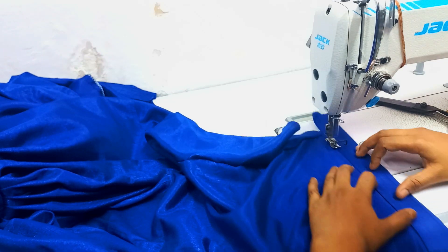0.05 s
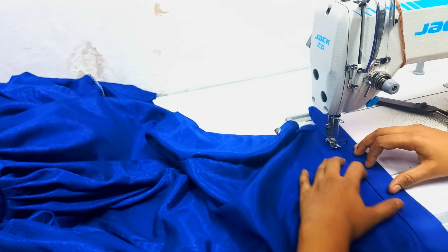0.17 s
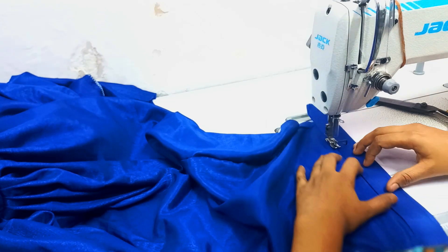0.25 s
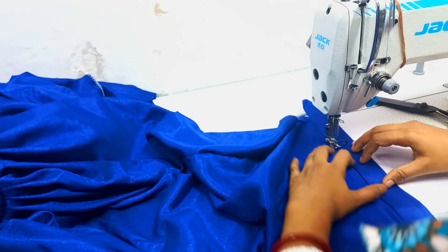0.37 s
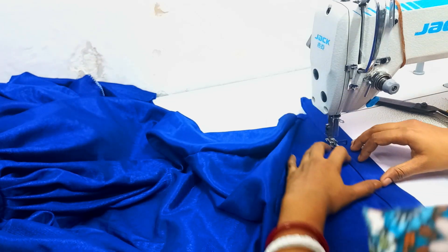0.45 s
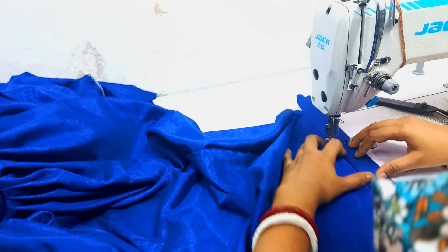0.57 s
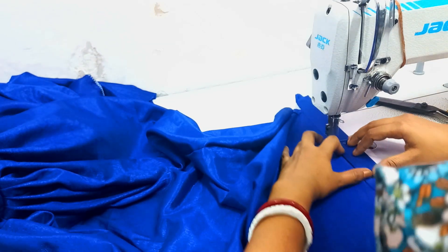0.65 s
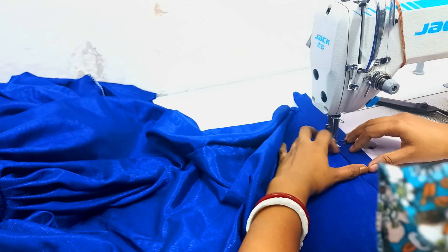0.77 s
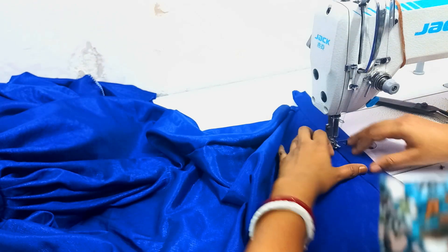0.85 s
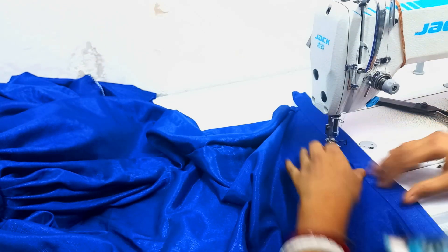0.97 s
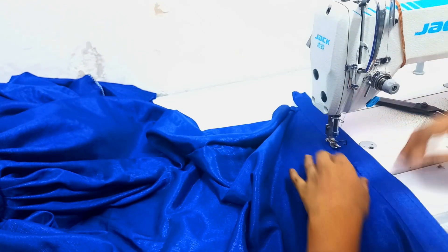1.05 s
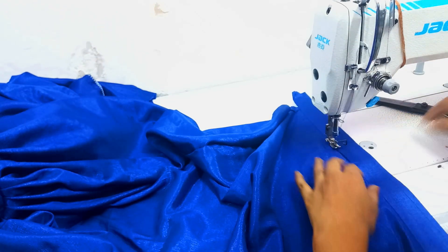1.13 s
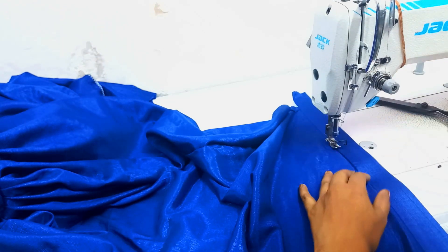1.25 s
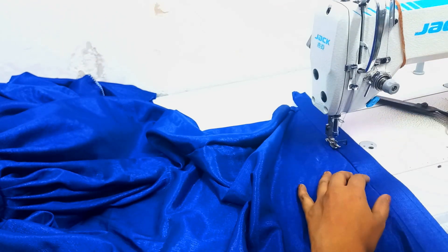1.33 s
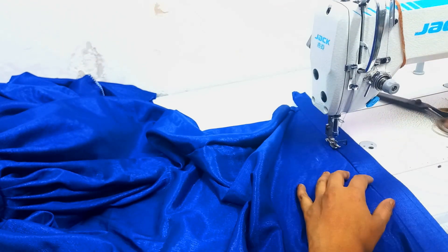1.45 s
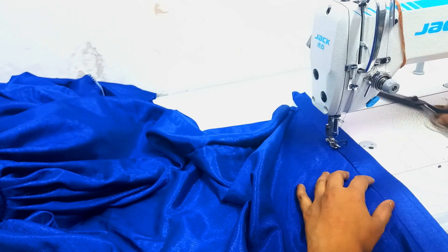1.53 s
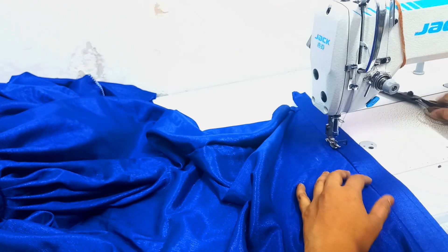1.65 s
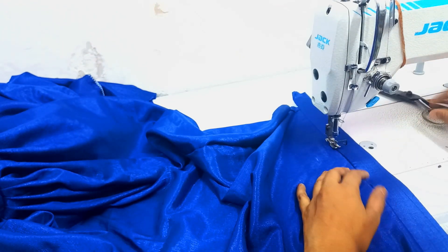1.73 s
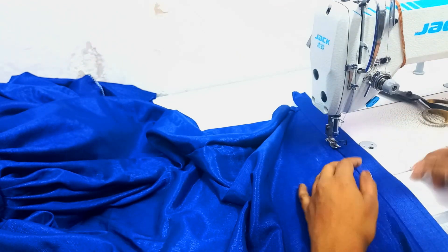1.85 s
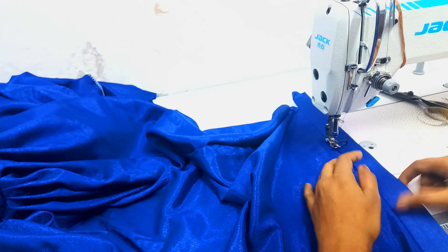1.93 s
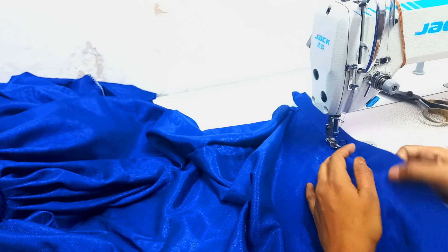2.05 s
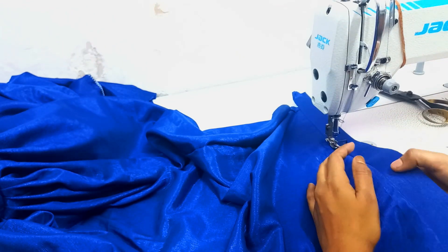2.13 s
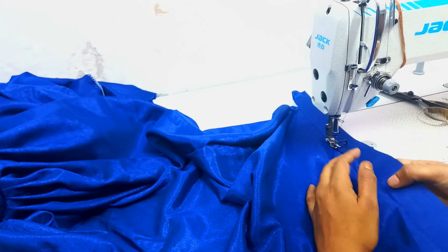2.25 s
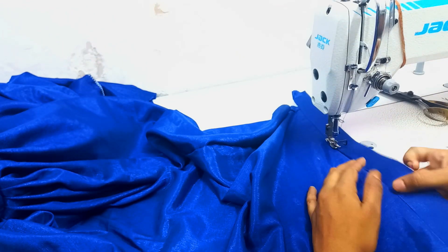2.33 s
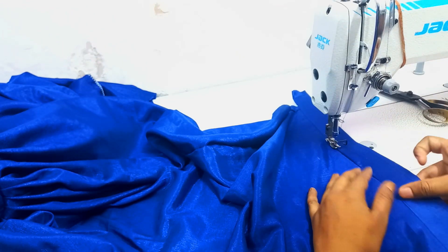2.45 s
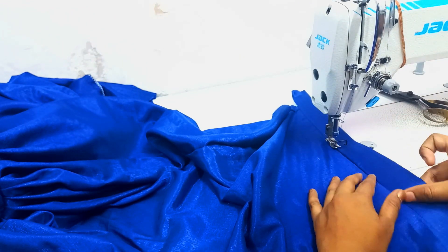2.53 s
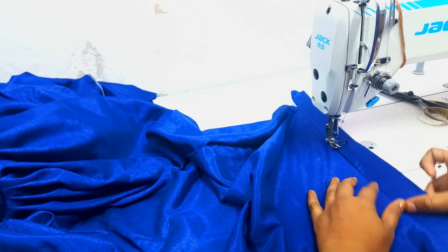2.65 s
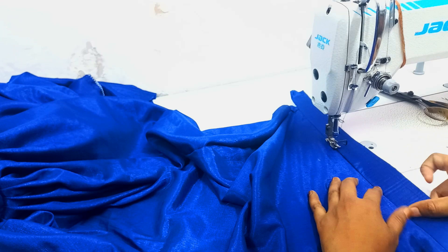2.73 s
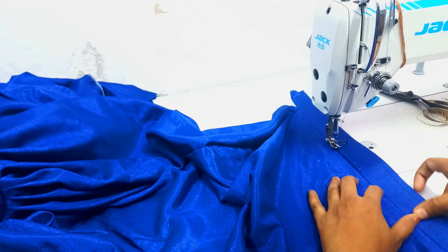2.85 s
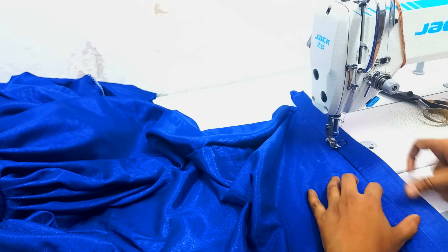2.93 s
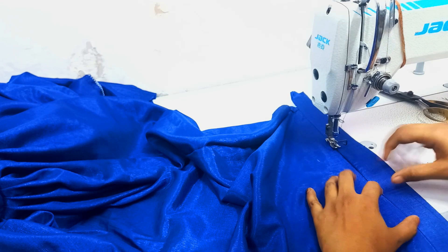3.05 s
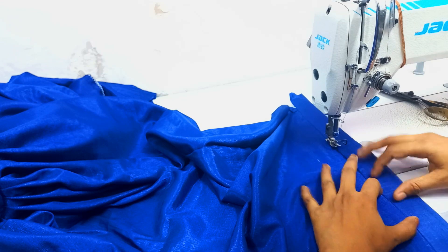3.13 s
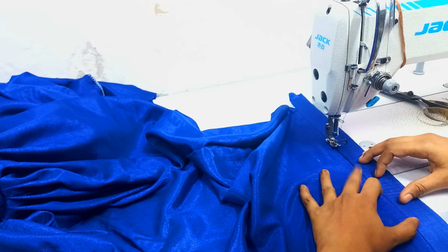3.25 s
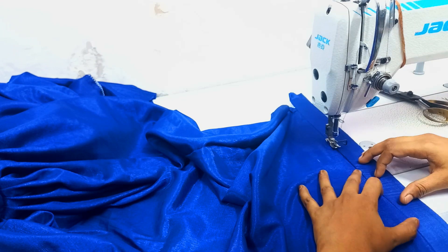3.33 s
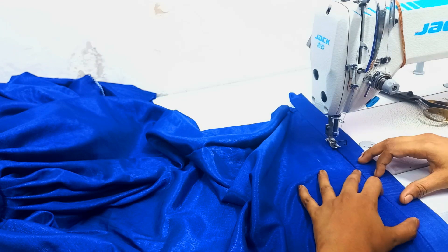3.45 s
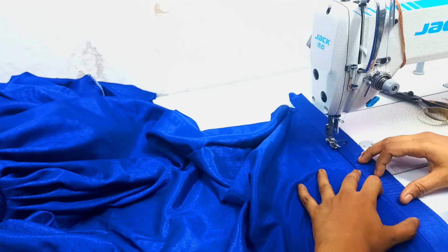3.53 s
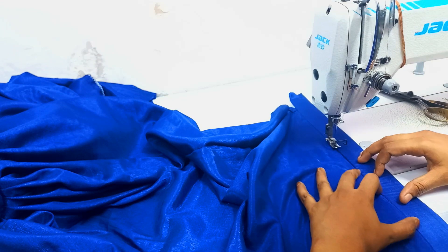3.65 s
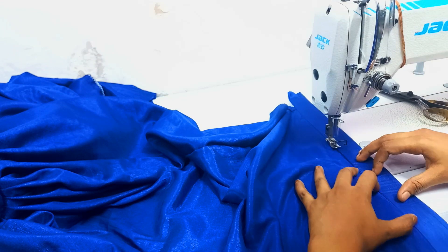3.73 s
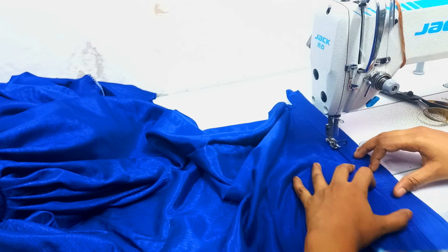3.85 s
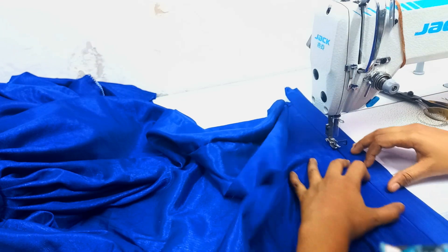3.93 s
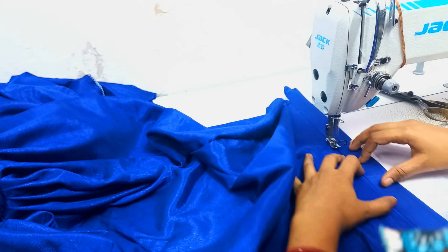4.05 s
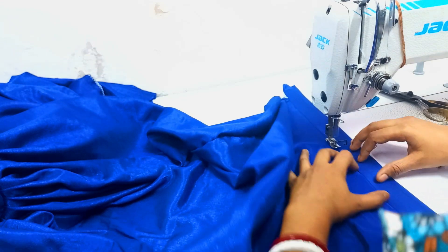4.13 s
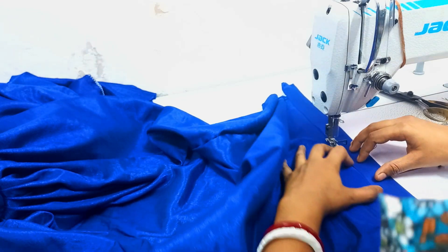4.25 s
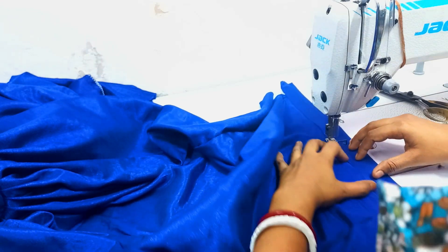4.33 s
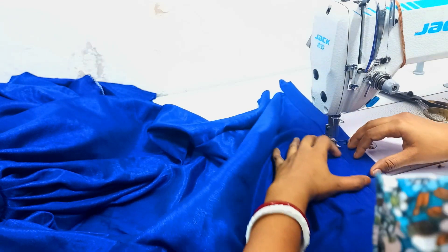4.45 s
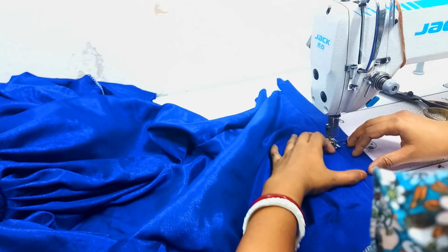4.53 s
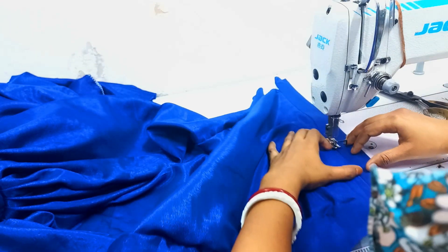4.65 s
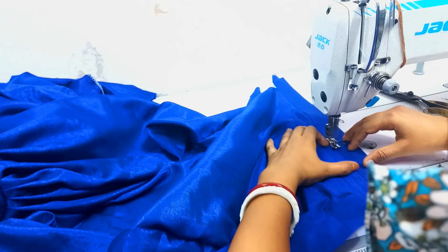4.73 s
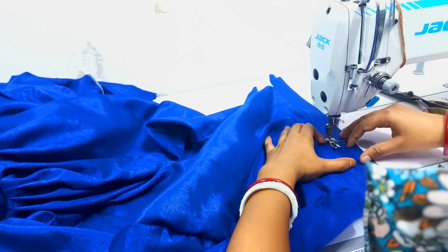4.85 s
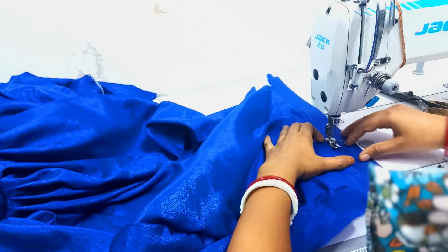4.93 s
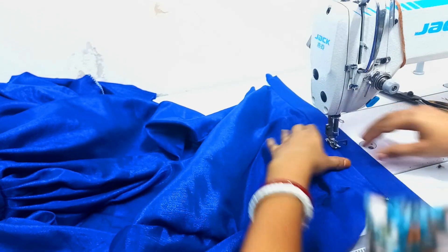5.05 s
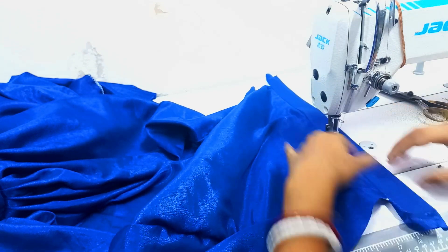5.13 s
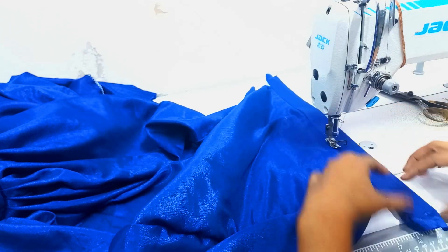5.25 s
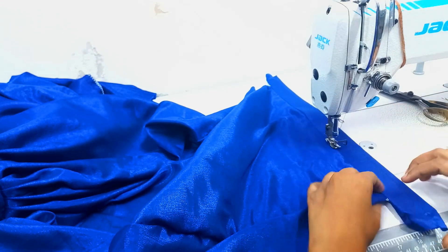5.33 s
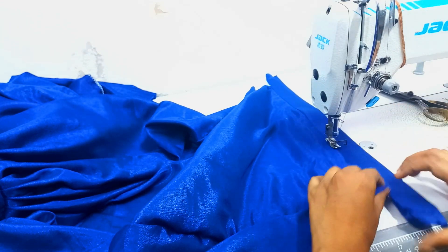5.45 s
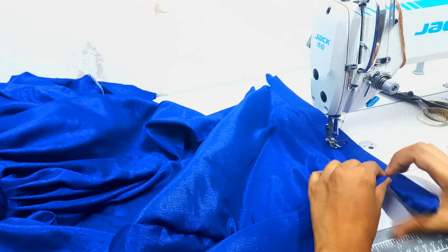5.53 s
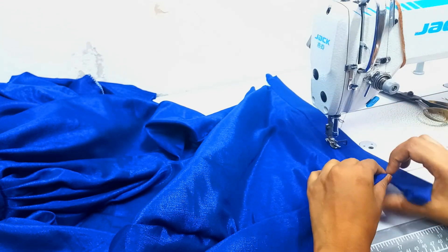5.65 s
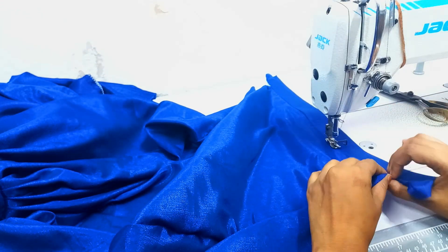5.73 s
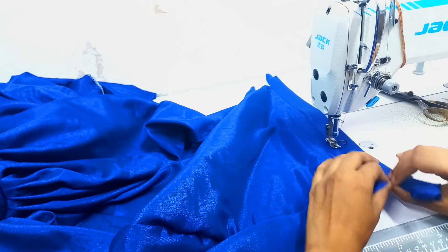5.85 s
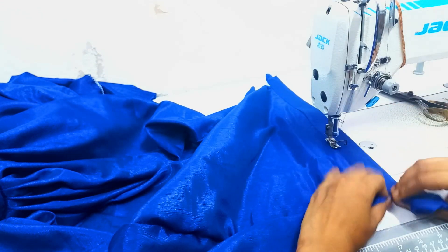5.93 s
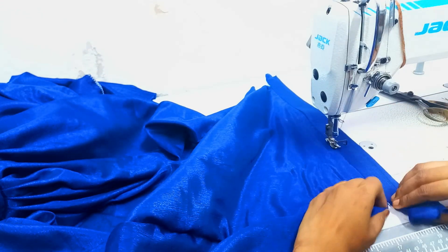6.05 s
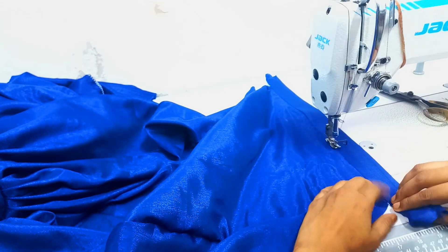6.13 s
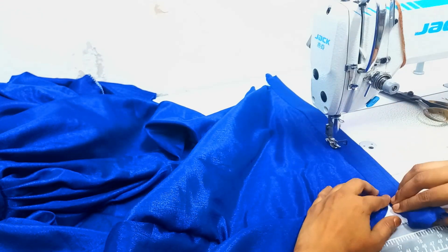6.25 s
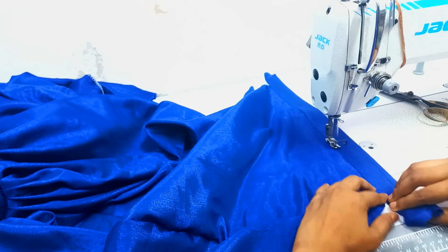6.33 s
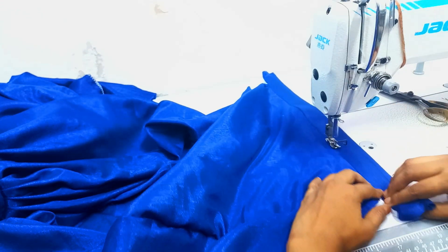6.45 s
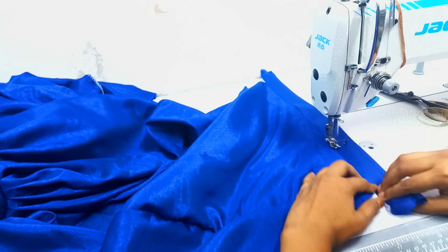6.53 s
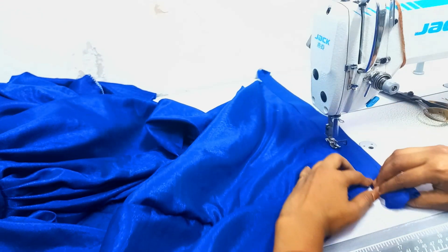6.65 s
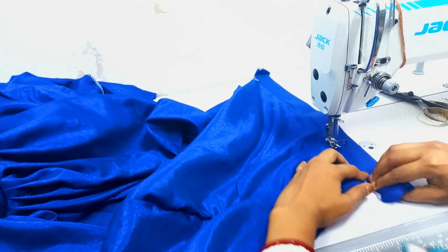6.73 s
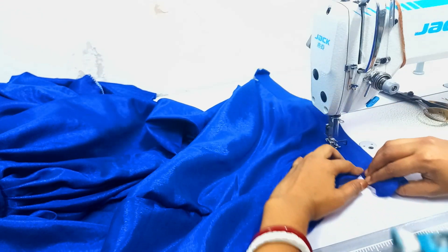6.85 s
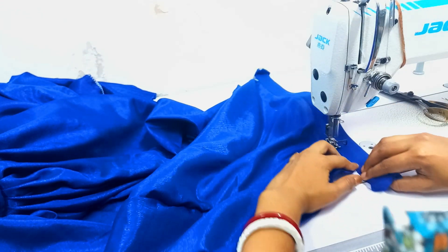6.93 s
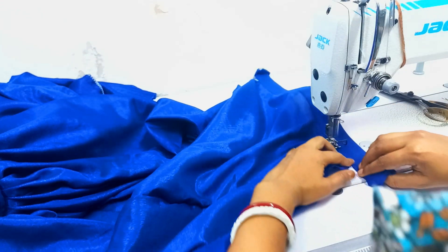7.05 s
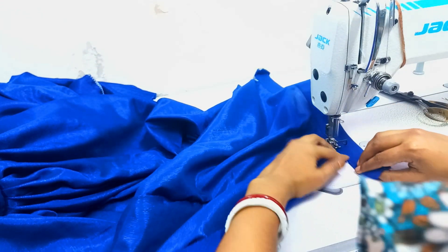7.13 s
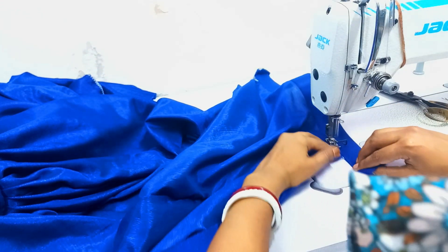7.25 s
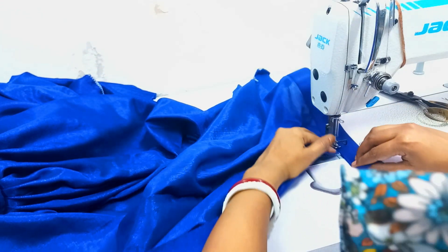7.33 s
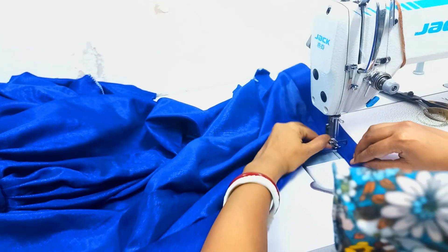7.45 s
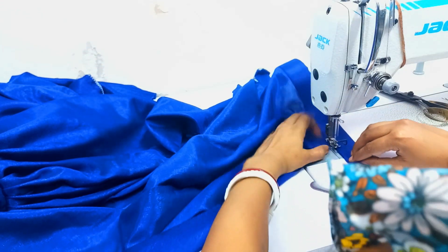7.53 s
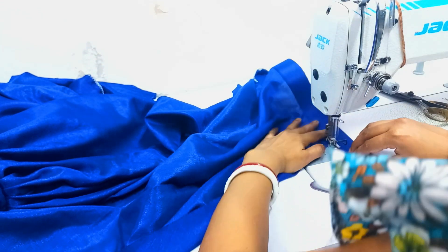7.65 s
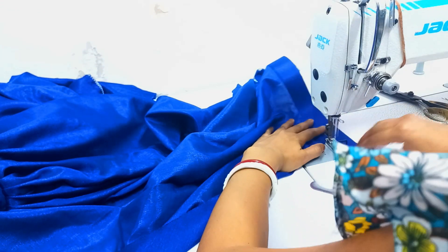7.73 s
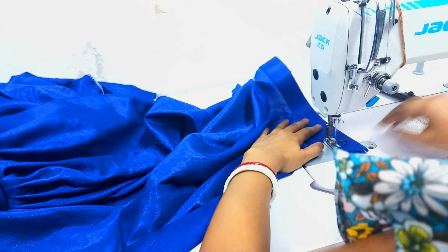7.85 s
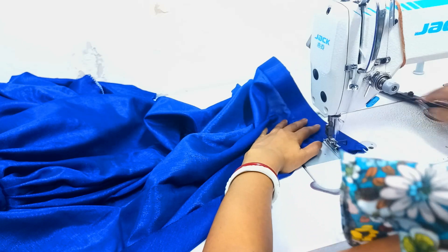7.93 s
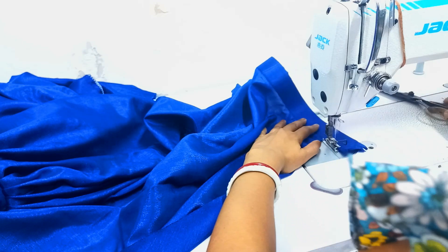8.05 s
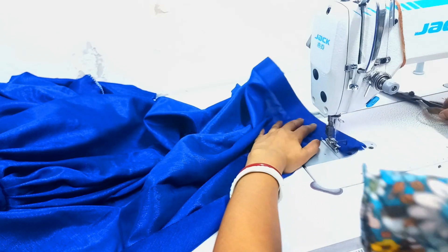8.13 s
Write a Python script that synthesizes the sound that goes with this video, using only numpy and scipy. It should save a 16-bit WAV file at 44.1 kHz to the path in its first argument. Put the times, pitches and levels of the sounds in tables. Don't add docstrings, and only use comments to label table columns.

```python
import sys
import numpy as np
from scipy import signal
from scipy.fft import rfft, irfft, next_fast_len
from scipy.io import wavfile
from scipy.ndimage import uniform_filter1d, map_coordinates

SR = 44100
rng = np.random.default_rng(int(sys.argv[2]) if len(sys.argv) > 2 else 0)


def put_to_file(sound):
    columns = np.atleast_2d(sound).T
    safe = np.clip(columns, -1, 1)
    whole_steps = np.round(safe * 32767)
    wavfile.write(sys.argv[1], SR, whole_steps.astype(np.int16))


def boost_factor(decibels):
    exponent = np.asarray(decibels, float) / 20
    return 10 ** exponent


N = 360633
T = np.arange(N) / SR


def unit(x):
    return x / np.sqrt(np.mean(x ** 2) + 1e-20)


def along(points, hz):
    f, v = np.transpose(points)
    return np.interp(np.log(hz + 1), np.log(f + 1), v)


def curves(tables):
    rows = []
    for table in tables:
        silence = (-120,) * (len(table[0]) - 1)
        rows += [(table[0][0] - .02,) + silence, *table, (table[-1][0] + .04,) + silence]
    s, *cols = np.transpose(rows)
    return [np.interp(T, s, c) for c in cols]


def wobble(rate):
    coarse = T[::64]
    knots = rng.standard_normal(int(N * rate / SR) + 4)
    return np.interp(T, coarse, map_coordinates(knots, [coarse * rate]))


def filtered(x, response):
    m = next_fast_len(len(x) + 8192)
    return irfft(rfft(x, m) * response(np.fft.rfftfreq(m, 1 / SR)), m)[:len(x)]


def coloured(x, spectrum):
    return unit(filtered(x, lambda hz: boost_factor(along(spectrum, hz))))


def noise():
    return rng.standard_normal(N)


def lines(turn, speed, orders, response, drift_db, levelled=True, apart=1):
    gains = [boost_factor(db + along(response, k * speed)) for k, db in orders]
    total = 0
    for gain, (k, _) in zip(gains, orders):
        phase = k * turn + apart * (rng.random() - .5)
        total = total + gain * boost_factor(drift_db * wobble(12)) * np.cos(2 * np.pi * phase)
    return total / (np.sqrt(np.sum(np.square(gains), axis=0) / 2) if levelled else 1)


def causal(x, spectrum):
    ceps = irfft(np.log(boost_factor(along(spectrum, np.fft.rfftfreq(4096, 1 / SR))) + 1e-6))
    ceps[1:2048] *= 2
    ceps[2049:] = 0
    answer = irfft(np.exp(rfft(ceps)))
    return signal.fftconvolve(x, answer / np.linalg.norm(answer))[:N]


def knocks(events, body, level_db):
    push, t = np.zeros(N + SR), T[:SR // 2]
    for s, db, rise, t60 in events:
        swell = 1 - np.exp(-t / max(rise, 1e-4))
        decay = boost_factor(db - 60 * t / max(t60, .01))
        push[round(s * SR):][:len(t)] += decay * swell * rng.standard_normal(len(t))
    return boost_factor(level_db) * causal(push[:N], body)


def rings(rows, attack_s):
    out, t = np.zeros(N + SR), T[:SR // 2]
    for s, db, hz, t60 in rows:
        envelope = boost_factor(db - 60 * t / t60) * (1 - np.exp(-t / attack_s))
        out[round(s * SR):][:len(t)] += envelope * np.sin(2 * np.pi * hz * t)
    return out[:N]


def swells(rows):
    levels = []
    for s, db, hold, fall, rise in rows:
        levels.append(db - rise * np.clip(s - T, 0, None) - fall * np.clip(T - s - hold, 0, None))
    return np.max(levels, axis=0)


# (time [s], shaft speed [turns/s], running level [dB])
FIRST_BURST = [
    (0.0, 70.07, -23.5),
    (0.11, 66.65, -21.3),
    (0.585, 66.4, -21.3),
    (0.66, 61.27, -21.5),
    (0.795, 51.07, -26),
    (0.884, 46.27, -25.5),
    (0.93, 43.83, -33.5),
    (1.0, 40.86, -46),
    (1.03, 39.7, -56),
    (1.2, 37.63, -101),
]
SECOND_BURST = [
    (3.815, 30.2, -77),
    (3.896, 35.79, -43.5),
    (3.95, 40.33, -31.5),
    (4.085, 56.08, -24.5),
    (4.31, 51.83, -25.5),
    (4.6, 48.33, -25),
    (4.9, 44.15, -25.5),
    (5.03, 35.62, -28.5),
    (5.14, 33.96, -49),
    (5.25, 33.21, -90),
]
THIRD_BURST = [(6.458, 30.54, -62), (6.5, 34.2, -38), (6.6, 47.86, -26), (6.645, 50.37, -26),
               (6.72, 52.22, -25), (6.974, 50.16, -25), (7.56, 48.4, -24.5), (7.76, 46.13, -24),
               (7.85, 44.3, -27.5), (7.935, 42.71, -35), (8.0, 39.64, -58.5), (8.17, 38.74, -95)]


def shaft():
    speed, running_db = curves([FIRST_BURST, SECOND_BURST, THIRD_BURST])
    speed = np.clip(speed, 25, 80)
    loose = np.clip((68 - speed) / 10, .3, 1)
    turn = np.cumsum(speed * (1 + .003 * loose * wobble(15))) / SR
    return speed, running_db, loose, turn


def brake_unevenness(acceleration, rate):
    return 2 * np.clip(-acceleration / 50, 0, 1) * (wobble(rate) - .5)


# (frequency [Hz], level [dB])
TABLE_RESPONSE = [(30, -10), (48, 0), (58, -2), (67, 7), (80, -2.5), (100, 4.5), (123, -11)]
# (shaft speed [turns/s], level [dB])
SHAKE_AT_SPEED = [(33, -10.5), (37, 4), (42, 1), (46, -3.5), (52, -6), (57, -0.5), (66, 3.5), (71, 12)]


def table_shake(turn, speed, running_db, loose, acceleration):
    level_db = running_db + along(SHAKE_AT_SPEED, speed) + brake_unevenness(acceleration, 28)
    shake = lines(turn, speed, [(1, 0.8), (2, -1.5)], TABLE_RESPONSE, drift_db=1.2, apart=0)
    rumble = coloured(noise(), [(15, -42.5), (35, 2.0), (110, 1.0), (200, -47.5)])
    shake += boost_factor(-23.5 + 15 * loose) * rumble
    return boost_factor(level_db - 1.5 + .6 * loose * wobble(9.9)) * shake


# (order [multiple of shaft speed], level [dB])
SHAFT_ORDERS = [(3, 1.5), (4, 0), (5, -8), (6, 2), (6.28, -1), (7, 0), (8, -2), (9, -6), (9.4, -9),
                (10, -2), (11, -1), (12, -3), (12.57, 0), (13, -7), (14, -12), (16, -18)]
# (frequency [Hz], level [dB])
BED_RESPONSE = [(140, -5), (175, 5), (197, 1), (240, 0), (266, -9), (291, 9), (310, 1), (345, 1), (398, 7),
                (418, 12), (440, 0), (475, 1), (515, 3), (565, 6), (610, 6), (660, 6), (740, 5), (830, 2),
                (950, 3)]
# (frequency [Hz], density [dB/Hz])
HUM_COLOUR = [(88, -37), (150, -5), (189, 0.5), (236, -5), (306, -0.5), (467, -0.5), (621, 3.5), (1000, -4),
              (1300, -44.5), (2200, -120)]
# (shaft speed [turns/s], level [dB])
HUM_AT_SPEED = [(33, -4), (37, -3), (41, -3), (45, 1.5), (52, 2), (59, 2.5), (66, 4.5), (71, 2.5)]


def bed_hum(turn, speed, running_db, loose, acceleration, load, braking, rattle):
    level_db = running_db + brake_unevenness(acceleration, 22) + along(HUM_AT_SPEED, speed)
    level_db += 0.94 - 3 * braking
    level_db -= 4.5 * load * np.clip(46 - speed, 0, 1)
    level_db += .6 * loose * wobble(11)
    orders = lines(turn - .065, speed, SHAFT_ORDERS, BED_RESPONSE, drift_db=2.5 * loose, apart=.1 + .9 * loose)
    hum = boost_factor(-1 - 1.5 * loose) * orders
    hum += boost_factor(-10 + 4.5 * loose) * coloured(rattle * noise(), HUM_COLOUR)
    return boost_factor(level_db) * hum


# (shaft angle [part of a turn], level [dB])
CONTACT_ANGLES = [(0.02, 8), (0.149, -3), (0.297, 3.5), (0.421, -8.5), (0.551, -3.5), (0.638, -10),
                  (.72, -9), (0.832, -0.5), (.92, -4.5)]


def strikes(turn, jitter_s, scatter_db, ring_s):
    t, out = T[:SR // 20], np.zeros(N)
    for angle, db in CONTACT_ANGLES:
        at = np.flatnonzero(np.diff(np.floor(turn - angle)))
        jitter, scatter = rng.standard_normal((2, len(at)))
        at = np.clip(at + np.round(jitter_s * SR * jitter).astype(int), 0, N - 1)
        blows = np.bincount(at, boost_factor(db + scatter_db * scatter), N)
        out += signal.fftconvolve(blows, rng.standard_normal(len(t)) * boost_factor(-60 * t / ring_s))[:N]
    return out / np.sqrt(uniform_filter1d(out ** 2, size=8000) + 1e-3)


# (frequency [Hz], density [dB/Hz])
CLATTER_COLOUR = [(590, -35), (1000, -7), (1380, -2), (1890, -5.5), (2070, -2), (2640, -7.5), (3860, -6),
                  (4190, -10), (4870, -7.5), (5150, -15), (5450, -15.5), (5700, -20.5), (8180, -24.5),
                  (9080, -23.5), (10300, -40), (14600, -42), (15800, -46.5)]


def part_clatter(turn, speed, loose, rattle):
    tight = np.clip((speed - 30) / 30, .3, 1.3)
    metal = tight * strikes(turn, jitter_s=.00003, scatter_db=2, ring_s=.03)
    return coloured(metal + (0.72 + 0.28 * loose) * rattle * noise(), CLATTER_COLOUR)


# (frequency [Hz], level [dB])
LEVER_COLOUR = [(6000, -30), (7500, -12), (8500, -8), (9100, 0), (9600, -10), (11000, -28), (13500, -24),
                (14600, -17), (15800, -28)]


def thread_lever(turn, speed, scatter_db, t60):
    at, t = np.flatnonzero(np.diff(np.floor(turn - .7))), T[:SR // 40]
    size = boost_factor(scatter_db * np.clip(rng.standard_normal(len(at)), -3, 1.4))
    snap = boost_factor(-60 * t / t60) * (1 - np.exp(-t / 0.0025))
    swell = signal.fftconvolve(np.bincount(at, size, N), snap)[:N]
    quieter_when_slow = np.clip((speed - 42) / 5, .75, 1)
    return boost_factor(-23.5) * quieter_when_slow * coloured(swell * noise(), LEVER_COLOUR)


# (frequency [Hz], bandwidth [Hz], level [dB])
COVER_MODES = [(3060, 110, -20), (3950, 130, -18), (4550, 80, -24), (4980, 130, -23), (5450, 70, -27),
               (7500, 150, -33)]


def loose_covers(flutter_db):
    total = 0
    for hz, width, db in COVER_MODES:
        ring = unit(filtered(noise(), lambda f: 1 / (1 + (2 * (f - hz) / width) ** 2)))
        total = total + boost_factor(db + flutter_db * (wobble(9) + wobble(30))) * ring
    return total


# (order [multiple of shaft speed], level [dB])
TOOTH_ORDERS = [(25.1, -12), (33, -2), (42, -4), (44, 2), (46, -9), (66, 1), (68, -11)]
# (frequency [Hz], level [dB])
PLATE_RESPONSE = [(1000, -10), (1320, -9), (1400, 3), (1470, -6), (1600, -1), (1700, -8), (1900, -9),
                  (2050, 3), (2110, -1), (2200, -8), (2310, -3), (2400, 7), (2480, 9), (2620, -12),
                  (2900, -10), (3050, -2), (3200, -9), (3290, -7), (3400, 4), (3700, 4), (3850, -6),
                  (4400, -10), (4550, 2)]


def tooth_whine(turn, speed, load, braking):
    level_db = -10 + 2.5 * load - 7 * braking + 3 * wobble(70)
    whine = lines(turn, speed, TOOTH_ORDERS, PLATE_RESPONSE, drift_db=2.5, levelled=False)
    return boost_factor(level_db) * np.clip((speed - 36) / 6, 0, 1) * whine


# (order [multiple of shaft speed], level [dB])
LOCKED_ORDERS = [(23, 3), (24, 2), (29, -4), (32, -4), (33, 3), (35, -3), (36, 4), (41, -5), (58, -7),
                 (68, -7)]


def full_speed_whine(turn, speed):
    whine = lines(turn, speed, LOCKED_ORDERS, [(1, 0)], drift_db=2, levelled=False)
    return boost_factor(-16) * np.clip((speed - 61) / 4, 0, 1) * whine


# (frequency [Hz], level [dB])
PULL_UP_COLOUR = [(400, 0), (630, -0.5), (800, 0), (1020, -20), (1250, -1), (2500, 0), (3600, -1),
                  (6000, 2.5)]


def machine():
    speed, running_db, loose, turn = shaft()
    acceleration = np.gradient(speed) * SR
    gaining = np.clip(acceleration / 40, 0, 1)
    pulling = uniform_filter1d(gaining * (T > 6), size=3000)
    starting = uniform_filter1d(gaining * np.clip((46 - speed) / 8, 0, 1), size=1500)
    load = uniform_filter1d(np.clip((acceleration - 22) / 30, 0, 1), size=2000)
    braking = uniform_filter1d(np.clip((-acceleration - 22) / 30, 0, 1), size=2000)
    rattle = boost_factor((4.5 - 2.3 * loose) * np.cos(2 * np.pi * (turn - .7)) + 1.2 * wobble(30))

    shake = table_shake(turn, speed, running_db, loose, acceleration)
    hum = bed_hum(turn, speed, running_db, loose, acceleration, load, braking, rattle)
    clatter = part_clatter(turn, speed, loose, rattle)
    clatter += thread_lever(turn, speed, scatter_db=3.5, t60=.018)
    clatter += rattle * loose_covers(flutter_db=2.5)
    clatter += tooth_whine(turn, speed, load, braking)
    clatter += full_speed_whine(turn, speed)
    clatter += clutch_bite(starting)
    clatter += singing_lid(speed)
    clatter += pull_up_whine(turn, speed, pulling)
    sparse = np.clip((-36 - running_db) / 10, 0, 1) * (1 - starting)
    clatter *= boost_factor(1.5 * sparse * np.clip(wobble(70) - .5, -2, 1))

    head = hum + boost_factor(running_db - 2.5) * clatter
    hollow = filtered(head, lambda hz: boost_factor(along(PULL_UP_COLOUR, hz)))
    return shake + (1 - pulling) * head + pulling * hollow


# (time [s], level [dB], frequency [Hz], T60 [s])
HANDLED_MODES = [(1.56, -52, 2202, .14), (1.56, -55, 2700, .2), (1.563, -44, 860, 0.18),
                 (1.605, -44.5, 590, 0.14), (1.556, -67, 4506, .3), (1.655, -72, 5700, .3),
                 (1.76, -42, 668, .09), (1.752, -47, 1007, 0.089), (1.752, -54, 1841, .12),
                 (1.77, -72, 4160, .2), (1.62, -72, 7074, .08), (5.055, -34, 860, .15),
                 (5.085, -41, 790, 0.13), (3.07, -74, 2250, .3), (6.466, -46.5, 640, 0.25),
                 (3.865, -55, 640, .2), (3.895, -44, 620, .15), (6.05, -73, 4300, .05),
                 (4.895, -34, 1415, .25), (4.93, -33, 1370, .15), (.03, -23.5, 630, .2),
                 (.035, -23.5, 680, .2)]


def handled_metal():
    return rings(HANDLED_MODES, attack_s=0.00092)


# (time [s], level [dB])
CLOTH_PULLS = [
    (0.95, -64),
    (1.05, -56.5),
    (1.66, -66.5),
    (2.7, -77),
    (2.86, -75),
    (3.4, -82),
    (5.1, -62),
    (7.98, -67),
]
# (frequency [Hz], density [dB/Hz])
CLOTH_COLOUR = [(1470, -31), (2500, -2.5), (3340, -9), (4390, -5.5), (4670, 2), (5200, -3.5), (5650, -4.5),
                (6350, -17), (7070, -9.5), (8400, -16.5), (9500, -25.5), (12400, -49), (20900, -120)]


def sliding_cloth(room_db):
    pull_db = swells([(s, db, 0, 180, 150) for s, db in CLOTH_PULLS])
    cloth = coloured(boost_factor(2.2 * wobble(60)) * noise(), CLOTH_COLOUR)
    return boost_factor(np.maximum(room_db - 20, pull_db) - 1.5) * cloth


# (time [s], peak level [dB], rise [s], T60 [s])
COASTING_KNOCKS = [(0.965, -40, .001, .05), (0.995, -32, .004, 0.077), (5.072, -29, .001, 0.059),
                   (5.118, -34.5, .002, 0.082), (5.135, -38, 0.0011, .05), (5.153, -46, .001, .05),
                   (5.168, -42, .001, 0.053), (5.195, -57, .001, .05), (7.972, -45, .001, .05),
                   (7.995, -48, .001, 0.049), (8.006, -52, .001, 0.053), (8.025, -50, .001, 0.046),
                   (8.0645, -55, .001, .04), (8.09, -58, .002, .06), (8.1, -60.5, .001, .04),
                   (8.148, -64, 0.0011, 0.04)]
# (frequency [Hz], density [dB/Hz])
COASTING_COLOUR = [(900, -38), (1600, -5), (2200, -6), (2600, -10), (3100, 1), (4000, -4), (5200, -7),
                   (7500, -23.5), (12000, -59.5)]


def coasting_parts():
    return knocks(COASTING_KNOCKS, COASTING_COLOUR, -5.0)


# (time [s], room level [dB], hold [s], sink [dB/s])
GATE_OPENINGS = [
    (0.97, -57.5, 0.0099, 50),
    (1.451, -64, 0.33, 23),
    (2.502, -64.5, .4, 34),
    (3.24, -65.5, 0.093, 33.5),
    (3.42, -62.5, 0.16, 48),
    (5.12, -62.5, .03, 39),
    (5.496, -65.5, 0.19, 34),
    (7.978, -57.5, 0.019, 77.5),
]


def gated_level():
    return swells([(*row, 280) for row in GATE_OPENINGS])


# (frequency [Hz], density [dB/Hz])
ROOM_COLOUR = [(47, -22), (80, -12.5), (135, -4.5), (256, -9), (349, -10), (476, -12.5), (1130, -15.5),
               (1880, -24), (4000, -38.5), (5200, -66), (8800, -120)]


def room_murmur(room_db):
    return boost_factor(room_db + 4.0) * coloured(boost_factor(1.3 * wobble(41)) * noise(), ROOM_COLOUR)


# (time [s], level [dB])
HAND_THUMPS = [(0.97, -46), (1.47, -45), (1.96, -54), (2.52, -41.5), (2.69, -45), (2.84, -41), (3.19, -50),
               (3.58, -52), (5.1, -37), (5.506, -41), (7.98, -46), (8.088, -53)]
# (frequency [Hz], density [dB/Hz])
THUMP_COLOUR = [(12, -29.5), (20, 1), (48, -1), (94, -3), (157, -15.5), (300, -31.5), (390, -56),
                (660, -120)]
# (time [s], level [dB], frequency [Hz], T60 [s])
PALM_LANDINGS = [
    (1.428, -30.5, 50, 0.075),
    (1.458, -44, 120, 0.19),
    (1.475, -45, 35.2, 0.2),
    (2.49, -52, 45.2, 0.16),
    (2.59, -37.5, 48.6, 0.15),
    (2.68, -45, 30.2, .15),
    (2.815, -30.5, 37.8, 0.14),
    (2.85, -28, 50, 0.082),
    (5.5, -23.5, 44.5, 0.13),
    (5.55, -33.5, 45, 0.19),
]


def board_thumps(room_db):
    thump_db = swells([(s, db, 0, 250, 350) for s, db in HAND_THUMPS])
    thump = boost_factor(np.maximum(room_db + 2.5, thump_db) - 3.5) * coloured(noise(), THUMP_COLOUR)
    return thump + rings(PALM_LANDINGS, attack_s=0.0062)


# (time [s], peak level [dB], rise [s], T60 [s])
THREAD_SNAPS = [(1.036, -37, 0.00094, 0.066), (1.2835, -58, 0.00083, 0.058), (5.1394, -37.5, 0.0011, 0.059),
                (5.4221, -49.5, 0.001, 0.056), (5.4394, -55.5, 0.0014, 0.072), (0.978, -44, .001, .04),
                (1.163, -58, .001, 0.039), (8.007, -53, .001, .03), (8.0645, -57, .001, 0.027),
                (8.147, -61, .001, .03), (8.17, -62, .001, .04)]
# (frequency [Hz], density [dB/Hz])
SNAP_COLOUR = [(1760, -47), (3000, -21), (3390, 2), (3870, -26), (4920, 1.5), (6340, -12.5), (8350, -5.5),
               (9710, -12), (15500, -29.5)]


def thread_snaps():
    return knocks(THREAD_SNAPS, SNAP_COLOUR, -9.0)


# (time [s], peak level [dB], rise [s], T60 [s])
GUIDE_TICKS = [
    (1.0355, -40, 0.0014, 0.046),
    (1.0998, -55.5, 0.002, 0.12),
    (1.1635, -62, 0.0019, 0.11),
    (5.1659, -44, 0.0016, 0.092),
    (5.742, -37, 0.002, 0.086),
    (5.7538, -45.5, 0.0014, 0.12),
    (8.066, -65.5, 0.0027, 0.11),
]
# (frequency [Hz], density [dB/Hz])
TICK_COLOUR = [(1060, -54), (1800, -31), (2440, -14), (3440, -41), (4090, -7), (4910, -18), (5540, -46),
               (6830, -36), (9000, -49), (11700, -71), (19800, -120)]


def guide_ticks():
    return knocks(GUIDE_TICKS, TICK_COLOUR, -9.5)


# (time [s], level [dB], frequency [Hz], T60 [s])
METAL_RINGS = [
    (3.385, -33, 483, .44),
    (3.385, -34, 1040, .2),
    (1.56, -42, 1085, .2),
    (3.59, -69, 2500, .22),
    (2.61, -72, 2350, .25),
    (1.036, -44, 4920, .1),
    (1.044, -47, 5150, .07),
    (1.10, -61, 2550, .06),
    (5.225, -63, 2200, .08),
    (1.547, -47, 3100, .06),
]


def metal_rings():
    return rings(METAL_RINGS, attack_s=0.00092)


# (time [s], peak level [dB], rise [s], T60 [s])
LIFT_KNOCKS = [
    (1.546, -37, 0.002, 0.28),
    (1.558, -31, 0.0012, 0.18),
    (1.599, -37, 0.002, 0.09),
    (1.619, -55, 0.002, 0.13),
]
# (frequency [Hz], density [dB/Hz])
LIFT_COLOUR = [(180, -46), (300, -30), (501, -6.5), (586, -15), (757, -3.5), (991, -15), (1100, 0),
               (1780, -27), (2170, -22), (2880, -18), (3670, -40), (4480, -31), (9000, -72), (11700, -89),
               (19800, -120)]
# (time [s], peak level [dB], rise [s], T60 [s])
SHIFT_KNOCKS = [
    (1.736, -39, 0.003, 0.095),
    (1.751, -31.5, 0.0036, 0.19),
    (1.764, -45, 0.003, 0.054),
    (1.799, -57, 0.0028, 0.11),
    (2.119, -53, 0.0032, 0.26),
]
# (frequency [Hz], density [dB/Hz])
SHIFT_COLOUR = [(180, -46), (300, -9), (428, -30), (636, 0.5), (765, -13), (1010, -2), (1280, -2.5),
                (1480, -34), (1900, -15), (2710, -39), (7000, -40), (9100, -72), (15400, -120)]


def lifted_shears():
    return knocks(LIFT_KNOCKS, LIFT_COLOUR, -8.0) + knocks(SHIFT_KNOCKS, SHIFT_COLOUR, -9.5)


# (time [s], peak level [dB], rise [s], T60 [s])
DROP_KNOCKS = [
    (3.179, -23.5, 0.0019, 0.14),
    (3.191, -26.5, 0.002, 0.16),
    (3.204, -34.5, 0.00198, 0.15),
]
# (frequency [Hz], density [dB/Hz])
DROP_COLOUR = [(88, -52.5), (150, -21), (290, -7.5), (467, -27), (541, -2), (687, -6), (938, -17),
               (1170, -1), (1570, -6.5), (1920, -15.5), (2100, -11.5), (2720, -23.5), (5260, -26.5),
               (7310, -39.5), (12000, -77), (15600, -109), (22000, -120)]
# (time [s], peak level [dB], rise [s], T60 [s])
BLADE_KNOCKS = [
    (3.1797, -33, 0.00093, 0.077),
    (3.3603, -33, 0.0012, 0.04),
    (3.3758, -27, 0.0012, 0.04),
    (3.3873, -29, 0.0012, 0.04),
    (3.3954, -31, 0.0012, 0.09),
]
# (frequency [Hz], density [dB/Hz])
BLADE_COLOUR = [(1880, -51), (3400, -16.5), (4300, 5.5), (4900, -9.5), (5300, -36), (6470, -18),
                (7000, -50), (9100, -66), (15400, -120)]
# (time [s], level [dB], frequency [Hz], T60 [s])
STEEL_MODES = [(3.18, -36, 4100, 0.053), (3.18, -33.5, 690, 0.14), (3.181, -36, 1573, .1),
               (3.19, -29.5, 1184, 0.096), (3.2, -33.5, 1560, 0.14), (3.2, -47.5, 1378, .2),
               (3.223, -40, 284, 0.13), (3.361, -48, 4560, 0.041), (3.376, -35, 4580, .04),
               (3.387, -42, 4270, 0.037), (3.397, -49, 4600, 0.054), (3.376, -28, 1836, .12),
               (3.38, -28.5, 1240, 0.15), (3.385, -29, 811, 0.16), (3.39, -36.5, 2100, 0.091),
               (3.4, -59, 3445, 0.14)]
# (time [s], peak level [dB], rise [s], T60 [s])
SET_DOWN_KNOCKS = [
    (3.361, -12.5, 0.0055, 0.23),
    (3.375, -5, 0.0027, 0.085),
    (3.384, -6, 0.011, 0.12),
    (3.394, -23, 0.006, 0.18),
]
# (frequency [Hz], density [dB/Hz])
SET_DOWN_COLOUR = [(180, -83.5), (300, -57), (462, 6), (680, -2), (1030, 5), (1260, -5.5), (1400, -24.5),
                   (1560, 2.5), (1830, -1.5), (2600, -29), (3710, -57), (4270, -24), (7210, -85),
                   (9820, -42), (12000, -84.5), (15600, -112), (22000, -120)]


def landing_shears():
    hits = knocks(DROP_KNOCKS, DROP_COLOUR, -6.0) + knocks(SET_DOWN_KNOCKS, SET_DOWN_COLOUR, -15.5)
    return hits + knocks(BLADE_KNOCKS, BLADE_COLOUR, -14.0) + rings(STEEL_MODES, attack_s=0.00092)


# (frequency [Hz], density [dB/Hz])
BITE_COLOUR = [(2300, -28), (3500, 6.5), (4500, -5), (6000, -33.5)]


def clutch_bite(starting):
    return boost_factor(1 + 1.6 * wobble(65)) * starting * coloured(noise(), BITE_COLOUR)


# (frequency [Hz], level [dB])
LID_COLOUR = [(1970, -50), (2025, -2), (2045, 0), (2070, -5), (2140, -50)]


def singing_lid(speed):
    near = np.clip(np.minimum(speed - 43.5, 51 - speed) / 1.5, 0, 1)
    return boost_factor(-14.5 + 1.5 * wobble(20)) * near * (T > 2) * coloured(noise(), LID_COLOUR)


def pull_up_whine(turn, speed, pulling):
    whine = lines(turn, speed, [(33, -4), (44, 0)], [(1, 0)], drift_db=2, levelled=False)
    return boost_factor(-7) * pulling * np.clip((50 - speed) / 3, 0, 1) * whine


# (time [s], peak level [dB], rise [s], T60 [s])
SEAM_KNOCK = [
    (7.7, -13.5, .002, .06),
]
# (frequency [Hz], density [dB/Hz])
SEAM_COLOUR = [(500, -27), (1000, -1.5), (1500, 2), (2200, -2), (3000, -18), (6000, -41)]


def seam_knock():
    return knocks(SEAM_KNOCK, SEAM_COLOUR, -5)


def scene():
    room_db = gated_level()
    sewing = machine() + coasting_parts() + seam_knock()
    workshop = sliding_cloth(room_db) + room_murmur(room_db) + board_thumps(room_db)
    small_parts = handled_metal() + thread_snaps() + guide_ticks() + metal_rings()
    return (sewing + workshop + small_parts + lifted_shears() + landing_shears())[None]


def band_limit(x):
    return signal.sosfilt(signal.butter(12, 15960, fs=SR, output="sos"), x)


def record(dry):
    mix = dry + boost_factor(-96.5) * noise()
    return band_limit(mix)


dry = scene()
out = record(dry)
put_to_file(out)
```